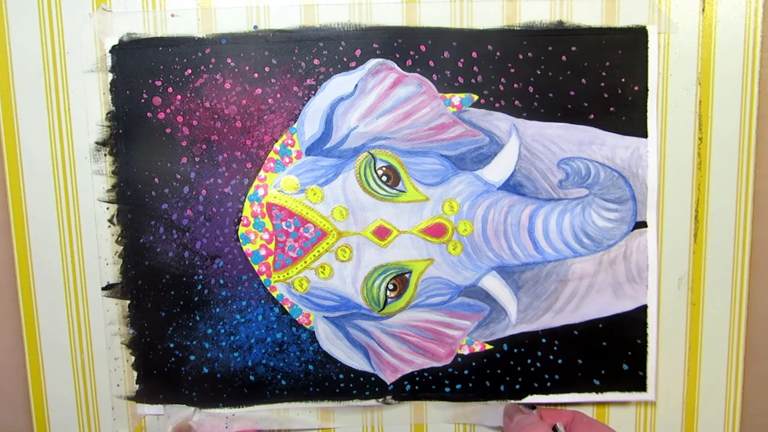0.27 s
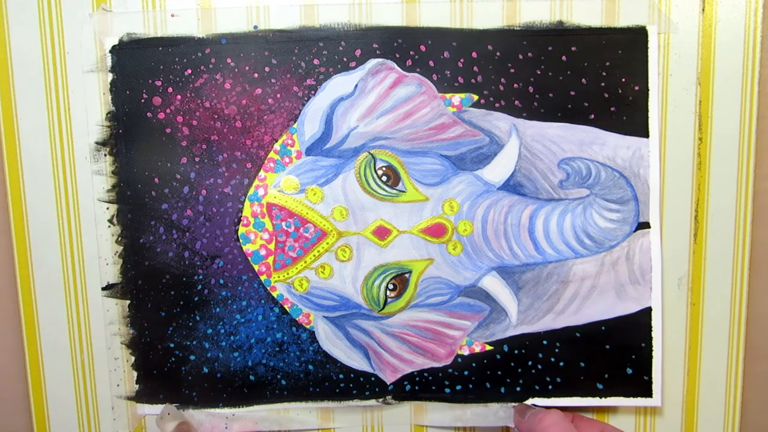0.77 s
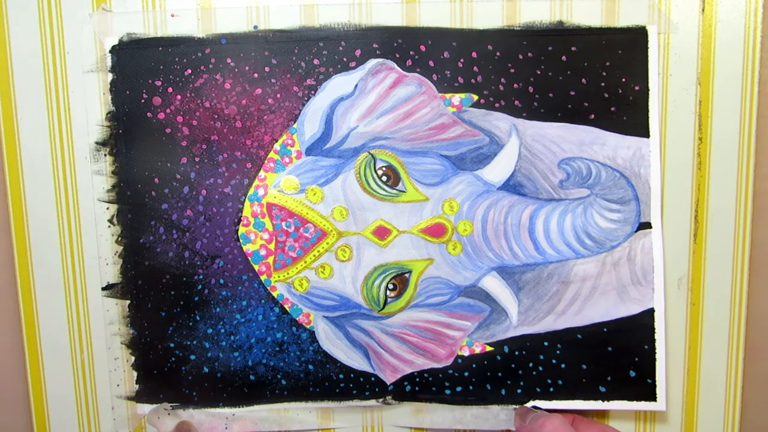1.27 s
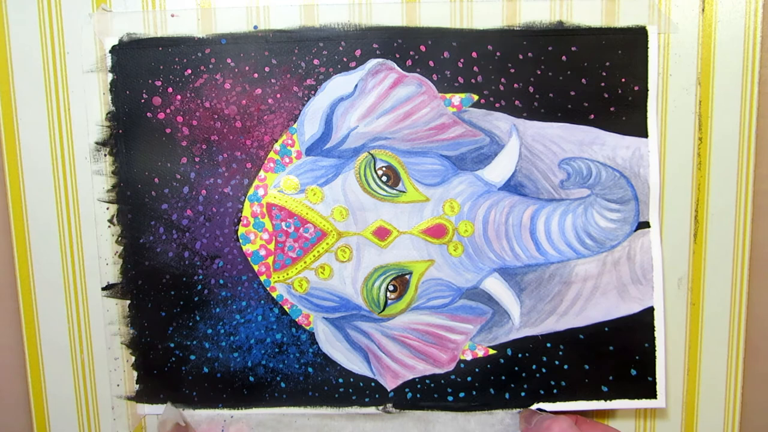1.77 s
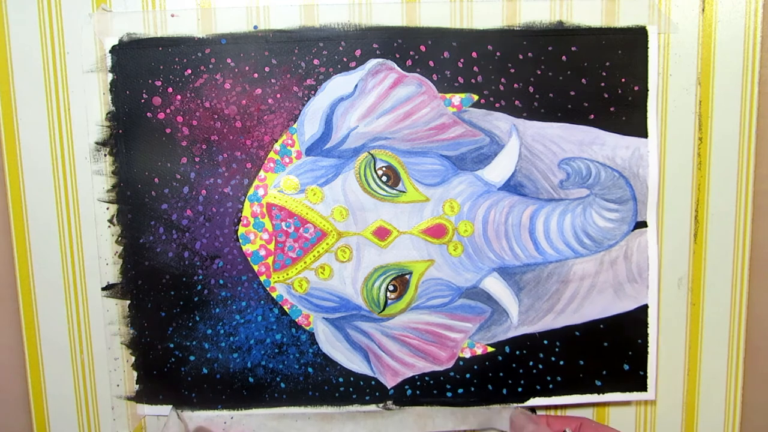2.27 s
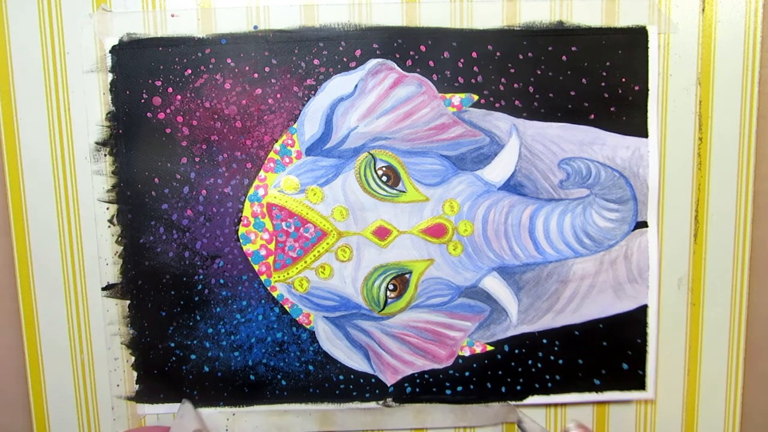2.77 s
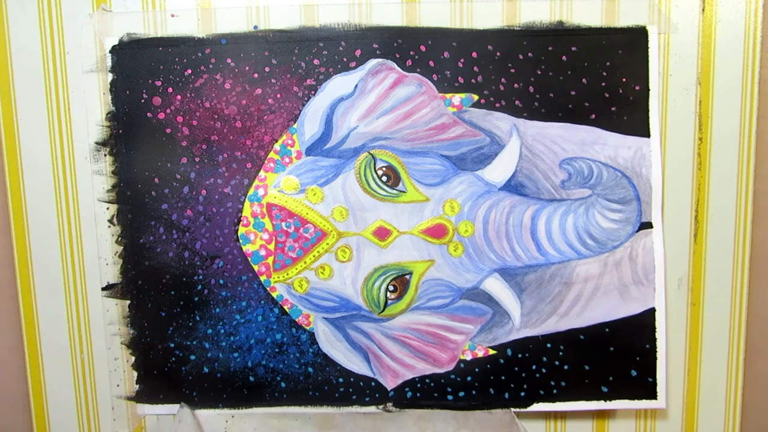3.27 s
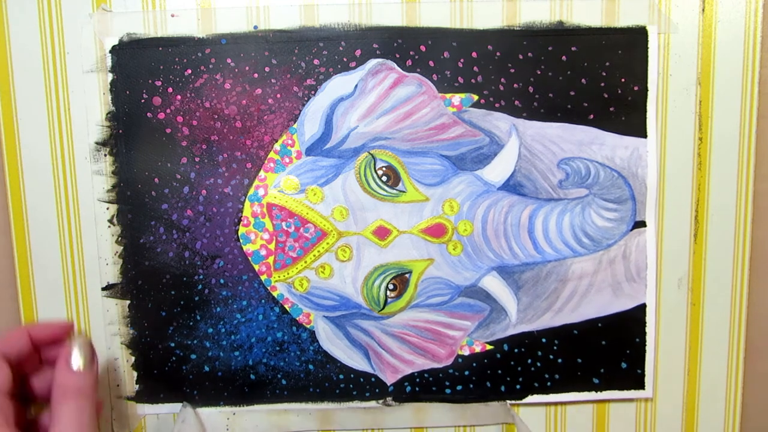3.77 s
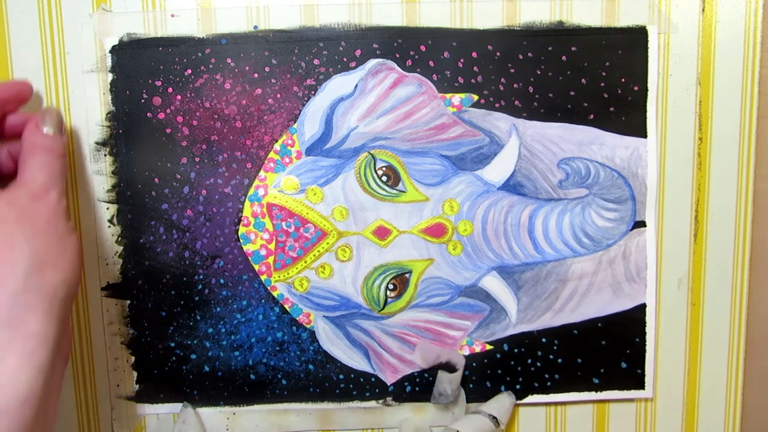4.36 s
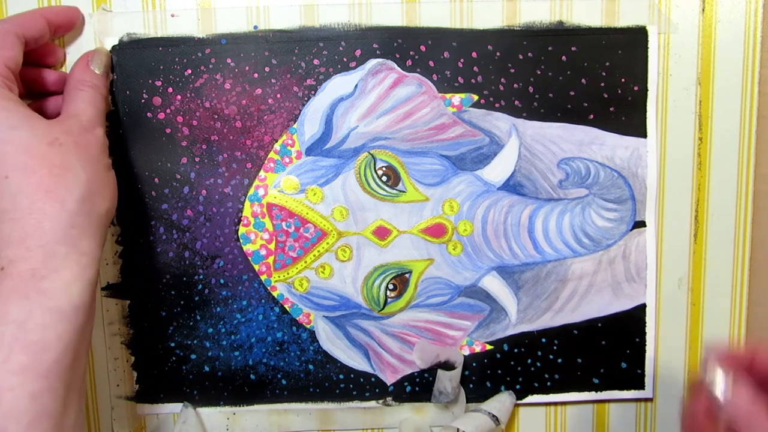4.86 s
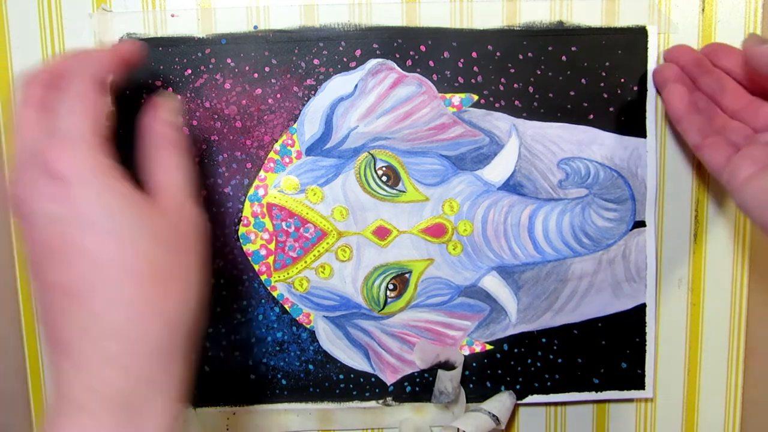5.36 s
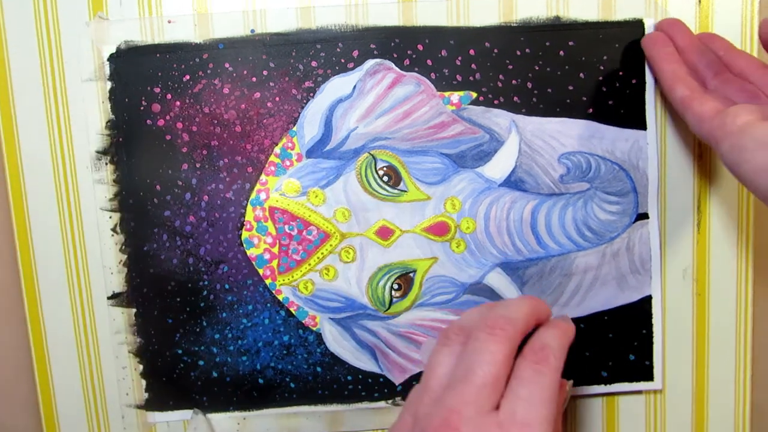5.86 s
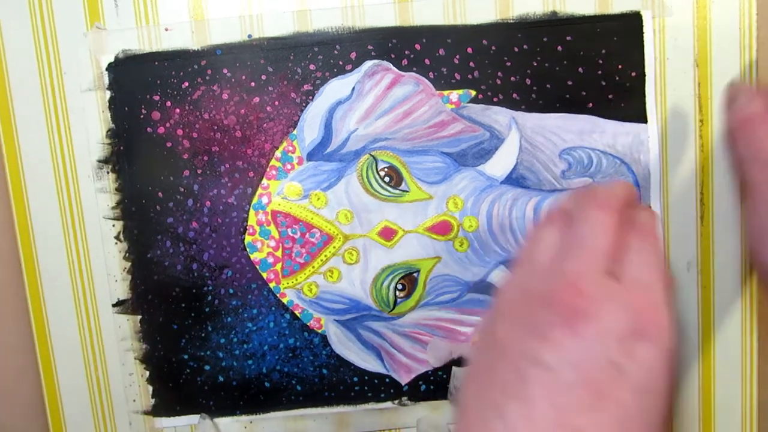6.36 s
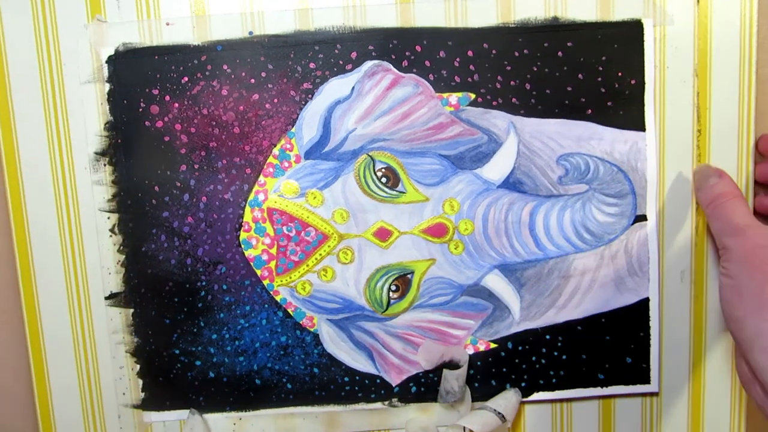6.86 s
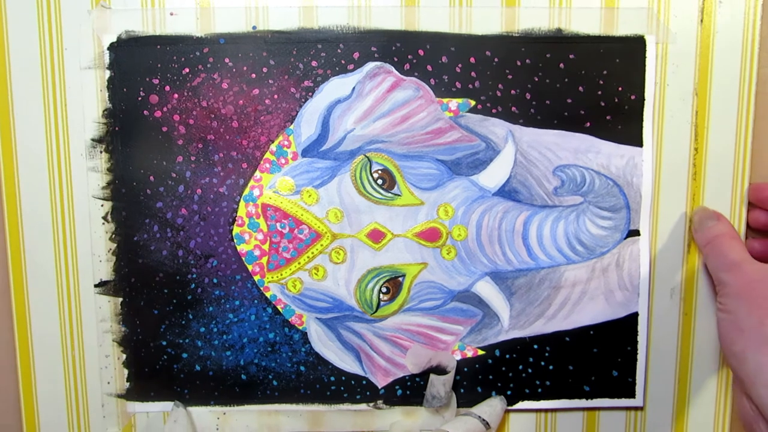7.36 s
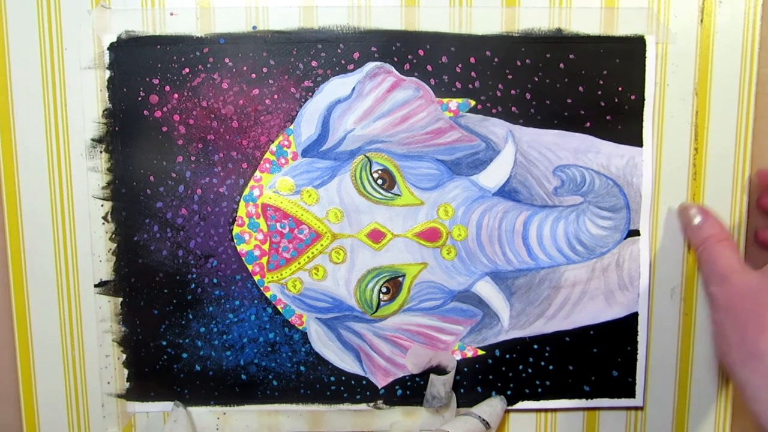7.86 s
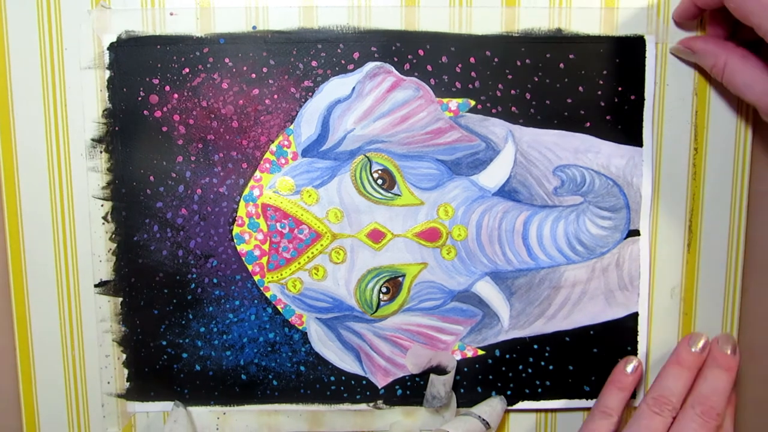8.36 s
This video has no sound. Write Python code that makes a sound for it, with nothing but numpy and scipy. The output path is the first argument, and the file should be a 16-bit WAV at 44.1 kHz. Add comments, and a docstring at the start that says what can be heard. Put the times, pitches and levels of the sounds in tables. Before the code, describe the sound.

A small quiet room, heard close from above in wide stereo: soft airy noise, a faint wavering hum and a very deep drone that swells near 1, 4 and 6 seconds. From the start tape peels off paper in jerks, fine sticky crackle with crisp crinkles, and a strong snap at 0.4. More pops follow at 0.55 and 0.8; from 1.0 to 1.7 rips and snaps crowd together, the loudest, densest stretch. A lull lasts until about 2.2, then lighter crumpling with sharp pops at 2.55 and 2.75, and thin, bright crinkling until about 4.0. At 4.3 a hand swishes over paper; at 4.66 the board slaps the table hard, bouncing quickly with a short woody ring, with small knocks until 5.0. From 5.1 to the end near 8.6, only faint paper rubs, with gaps, and a few tiny finger taps, slightly stronger after 8.3.

```python
"""Masking tape is pulled off a painted sheet in jerks: stick-slip of the glue gives bunches of fine clicks,
single clicks with a brief flutter are the snaps, and dense short runs are the rips. The loose strip is crumpled
from early on. Then hands slide over the paper in swells of clicks, and the board knocks on the table, ringing in
decaying modes; slides and a few faint finger taps end the scene. Throughout, a small quiet room adds coloured
noise, a low wavering hum and a swelling deep drone; all is heard from close above in wide stereo."""
import sys
import numpy as np
from scipy import signal
from scipy.fft import rfft, irfft
from scipy.io import wavfile
from scipy.ndimage import uniform_filter1d

SR = 44100
rng = np.random.default_rng(int(sys.argv[2]) if len(sys.argv) > 2 else 0)


def store_pcm(level_fs):
    """Save levels as 16-bit WAV."""
    pcm = np.round(np.clip(level_fs, -1, 1) * 32767).astype(np.int16)
    wavfile.write(sys.argv[1], SR, np.atleast_2d(pcm).T)


N = 380141
TIME = np.arange(N) / SR
SHOT = TIME[:4096]  # time axis of one short sound, also the length of a filter response

# colour of the tape on the sheet: f/Hz, relative level/dB
TAPE_COLOUR = [(100, -39), (300, -25.5), (600, -18), (1150, -12), (1500, -4.5), (2000, -4), (2700, -3),
               (4200, 1), (6000, -2.5), (8500, -6.5), (11000, -11), (16000, -18.5)]
# resonances of the taped sheet: f/Hz, width/Hz, lift/dB
SHEET_RESONANCES = [(1867, 49, 7.5), (2740, 130, 5), (3680, 97, 3), (4470, 130, -2), (5600, 210, 1.5),
                    (5700, 490, -1)]
# the loose strip is tugged, gathered and crumpled: t/s, length/s, level/dB, treble shelf/dB, ring of the fold f/Hz
CRUMPLE_MOVES = [(0.17, .03, -41.5, 7, 3500), (.21, 0.048, -37.5, 12, 3080), (0.261, 0.079, -51, 2, 6200),
                 (2.175, 0.1, -52.5, 3, 4200), (2.286, .17, -49.5, 8, 5550), (2.461, 0.054, -45, -3, 2480),
                 (2.661, 0.17, -52, -2, 5500), (2.828, .08, -37, 3.5, 4000),
                 (2.902, 0.16, -45.5, 5.5, 6500), (3.028, .27, -54, 2, 6700), (3.403, 0.305, -54, 6, 7020),
                 (3.493, 0.048, -42, 9.5, 7330), (3.658, 0.31, -45.5, 9.5, 7400),
                 (3.821, 0.093, -44.5, -1, 5800), (3.93, .15, -47.5, 10, 6900)]


def undb(db):
    """Amplitude ratio of a level in dB: 20 dB for each factor of ten."""
    return 10 ** (np.asarray(db) / 20)


def unit(x):
    """Normalisation to an rms amplitude of 1."""
    return x / np.sqrt(np.mean(x ** 2))


def fade(t, t60):
    """Exponential decay: the amplitude falls by 60 dB in t60 seconds."""
    return np.exp(-np.log(1000) * t / t60)


def add(out, s, sound):
    """Superposition: mix a sound in at time s, cut off at the end of the scene."""
    i = max(int(s * SR), 0)
    out[i:i + len(sound)] += sound[:max(N - i, 0)]


def through(x, response):
    """Linear filtering: convolve x with an impulse response."""
    return signal.oaconvolve(x, response)[:len(x)]


def body(points, bright_db=0, peaks=()):
    """Minimum-phase response: a causal filter with the given spectrum, treble shelf and resonant peaks."""
    hz = np.maximum(np.fft.rfftfreq(len(SHOT), 1 / SR), 1)
    f, db = np.transpose(points)
    shelf = bright_db / (1 + (4600 / hz) ** 3)
    db = np.interp(np.log(hz), np.log(f), db) + shelf
    for centre, width, lift_db in peaks:
        db = db + lift_db / (1 + (2 * (hz - centre) / width) ** 2)
    # folding the cepstrum onto positive times makes the response causal
    cepstrum = irfft(np.log(undb(db)))
    half = len(SHOT) // 2
    cepstrum[1:half] *= 2
    cepstrum[half + 1:] = 0
    return irfft(np.exp(rfft(cepstrum)))


def walk(rate, count=N):
    """Slow random modulation: a smoothed random staircase with rate steps a second and rms 1."""
    k = int(SR / rate)
    steps = np.repeat(rng.standard_normal(count // k + 1), k)
    return unit(uniform_filter1d(steps, k)[:count])


def clicks(count, rate, spread_db):
    """Random impulses at a mean rate per second: many small, a few large."""
    size = undb(spread_db * np.minimum(rng.exponential(size=count), 4))
    happens = rng.random(count) < rate / SR
    return unit(rng.standard_normal(count) * size * happens + 1e-9)


def stereo(mid, side):
    """Sum-and-difference matrix: left and right from mid and side."""
    return np.array([mid + side, mid - side])


def drone_level():
    """Amplitude envelope: bell-shaped swells over a faint, wandering rest level."""
    # t of the crest/s, half length/s, rms level/dB
    drone_crests = [(1.1, 0.54, -49.5), (4.02, 0.3, -52), (6.11, 0.34, -50), (6.82, 0.073, -56),
                    (8.56, 0.066, -55)]
    rest_db, wander_db = -65.5, 3
    swells = sum(undb(db) * np.exp(-((TIME - s) / half) ** 2) for s, half, db in drone_crests)
    return swells + undb(rest_db + wander_db * walk(7))


def background():
    """Diffuse noise and wavering hum, the noise mostly opposed between the channels, over a modulated drone."""
    # colour of the room air: f/Hz, relative level/dB
    air_colour = [(20, -1), (45, 10.5), (65, 9), (90, 1), (130, 6.5), (200, 3), (380, -1), (600, 0.5),
                  (1200, -1), (1750, 1), (2500, -4), (4000, -5.5), (7000, -8.5), (15000, -15.5)]
    # side of the air against its mid: f/Hz, level/dB
    air_spread = [(50, 8.5), (90, 3), (200, 12), (380, 13.5), (900, 15), (1700, 10.5), (4000, 9), (7000, 5),
                  (15000, 1.5)]
    # wavering hum: mean f/Hz, mean peak level/dB
    hum_tones = [(145.3, -76), (209.9, -70.5), (290.7, -74)]
    air_db, drone_hz = -57.0, 32
    mid, side = (unit(through(rng.standard_normal(N), body(air_colour))) for _ in range(2))
    drift = undb(0.8 * walk(4.7))
    air = undb(air_db) * drift * stereo(mid, through(side, body(air_spread)))

    hum = 0
    for hz, db in hum_tones:
        level = undb(db + 2.8 * walk(12))
        hum = hum + level * np.sin(2 * np.pi * hz * TIME + 1.5 * walk(5))

    cycles = np.cumsum(drone_hz + 0.6 * walk(1.76)) / SR
    drone = np.sqrt(2) * np.sin(2 * np.pi * cycles) * drone_level()
    return air + stereo(hum, 0.62 * hum) + stereo(drone, -.15 * drone)


def facets(depth_db, count=10):
    """Local resonance: each bit of bent tape has chance peaks and dips, as (Hz, width Hz, lift dB)."""
    hz = 1500 * 9 ** rng.random(count)
    return list(zip(hz, 0.13 * hz, depth_db * rng.uniform(-1.14, 1, count)))


def crackle(size, colour, bright_db, peaks, rate, spread_db, jerk_db, facet_db, count=2):
    """Stick-slip: several spots give off fine clicks in uneven bunches, each in its own colour."""
    out = np.zeros(size)
    for _ in range(count):
        jerks = undb(jerk_db * walk(59.96, count=size))
        bunches = clicks(size, rate / count, spread_db) * jerks
        spot = body(colour, bright_db, [*peaks, *facets(facet_db)])
        out += unit(through(bunches, spot))
    return unit(out)


def peeling():
    """Strain-driven stick-slip: glue crackles louder as each pull strains it, and dies as the tape slackens."""
    # the hand pulls on the tape: t/s, length/s, level at the end of the pull, before the trim/dB
    tape_pulls = [(0, 0.054, -42.5), (0.327, 0.064, -38), (0.476, 0.14, -44.5), (0.679, 0.042, -40.5),
                  (0.803, 0.064, -45), (1.037, .17, -36), (1.308, 0.26, -38.5), (1.498, 0.22, -38.5)]
    build_db, release_t60, trim_db = 8, 0.34, -3.0  # growth over a pull, decay in s, overall trim
    strain = 0
    for s, length, db in tape_pulls:
        t = TIME - s
        build = undb(db + build_db * (np.clip(t / length, 0, 1) - 1))
        strain = strain + (t >= 0) * build * fade(np.maximum(t - length, 0), release_t60)
    glue = crackle(2 * SR, TAPE_COLOUR, 0, SHEET_RESONANCES,
                   rate=4000, spread_db=1.5, jerk_db=3.5, facet_db=4.5, count=5)
    out = np.zeros(N)
    add(out, 0, glue)
    return out * strain * undb(trim_db)


def snaps(rows):
    """Sudden release of strain: clicks build up, then one sharp click, and a brief flutter dies away."""
    clean_t60, ragged_t60, flutter_db = 0.018, 0.039, -11  # flutter decay in s at cleanness 1 and 0
    strain_t60, strain_db = 0.0091, -23  # the build-up ahead of the click
    out, head, lead = np.zeros(N), int(.004 * SR), int(.015 * SR)
    t = SHOT - lead / SR
    for s, db, bright_db, clean in rows:
        t60 = ragged_t60 + clean * (clean_t60 - ragged_t60)
        build = undb(strain_db) * fade(abs(t), strain_t60)
        flutter = undb(flutter_db) * fade(abs(t), t60)
        push = np.where(t < 0, build, flutter) * clicks(len(SHOT), 16000, 2.1)
        push[lead] += 1.4 * clean
        snap = through(push, body(TAPE_COLOUR, bright_db, SHEET_RESONANCES + facets(5.5)))
        # the level holds for the first 4 ms from the click on
        add(out, s - lead / SR, snap * undb(db) / np.std(snap[lead:lead + head]))
    return out


def gestures(rows, colour, rate, spread_db, jerk_db, facet_db, lift_db, width_hz):
    """Friction noise: each move swells and fades; its clicks, sparse when gentle, ring the tape or paper."""
    reference_db, doubling_db = -44, 7  # the click rate equals rate at the first, doubles with each of the second
    out, t = np.zeros(N), TIME[:22050]
    for s, length, db, bright_db, hz in rows:
        swell = np.sqrt(np.maximum(np.sin(np.pi * np.minimum(t / length, 1)), 0))
        density = rate * 2 ** ((db - reference_db) / doubling_db)
        ring = [(hz, width_hz, lift_db)]
        move = swell * crackle(len(t), colour, bright_db, ring, density, spread_db, jerk_db, facet_db)
        add(out, s, move / np.std(move[t < length]) * undb(db))
    return out


def buckles(count=6):
    """Buckling instability: creases give way at random moments of each crumple; rows as for the snaps."""
    every_s, louder_db, scatter_db = .07, 5, 2
    brighter_db, clean = 3.5, 0.57  # a little brighter than their crumple
    rows = []
    for s, length, db, bright_db, _ in CRUMPLE_MOVES:
        times = (np.arange(count) + rng.random(count)) * every_s
        levels = db + louder_db + scatter_db * rng.standard_normal(count)
        for t, level in zip(times, levels):
            if t < length:
                rows.append((s + t, level, bright_db + brighter_db, clean))
    return rows


def crumpling():
    """Folding of a thin sheet: resonant bunches of clicks, with sharper buckles among them."""
    # colour of the loose strip: f/Hz, relative level/dB
    strip_colour = [(150, -34), (450, -9.5), (850, -2), (1200, -8.5), (2000, -3.5), (3200, -3.5),
                    (5000, -5.5), (7300, -7), (10000, -14.5), (13000, -29), (16000, -19)]
    folds = gestures(CRUMPLE_MOVES, strip_colour, rate=1500, spread_db=2.5, jerk_db=4.5,
                     facet_db=10.5, lift_db=8.5, width_hz=700)
    return folds + snaps(buckles())


def rips():
    """Chain of fractures: a run of glue threads breaks in quick succession as a stretch of tape tears loose."""
    # t/s, length/s, level before the trim/dB, treble shelf/dB
    tape_tears = [(0.84, .012, -33, 0), (1.049, 0.069, -30, 2), (1.137, 0.036, -28, -3),
                  (1.372, 0.014, -24, -7), (1.469, 0.071, -29.5, 0), (1.569, 0.058, -27.5, 3),
                  (1.662, 0.029, -25, 3), (2.847, 0.026, -27.5, 3), (2.957, 0.02, -29.5, 7),
                  (3.498, 0.016, -31, 19), (3.759, 0.015, -30.5, 15), (3.833, 0.02, -33.5, 32)]
    trim_db, release_t60 = -4.5, 0.012
    out = np.zeros(N)
    for s, length, db, bright_db in tape_tears:
        tear = crackle(len(SHOT), TAPE_COLOUR, bright_db, SHEET_RESONANCES,
                       rate=9000, spread_db=4.0, jerk_db=-0.5, facet_db=8.0)
        release = fade(np.maximum(SHOT - length, 0), release_t60)
        add(out, s, tear * undb(db + trim_db) * release)
    return out


def sliding():
    """Sliding friction: hands and board rub in dense, even clicks that ring the surface."""
    # t/s, length/s, level/dB, treble shelf/dB, ring of the surface f/Hz
    slide_moves = [(4.32, .31, -45.5, -2.5, 9400), (4.58, .36, -52.5, -2.5, 900),
                   (5.13, 0.053, -49, 2, 1800), (5.17, 0.14, -58.5, -3, 5900),
                   (5.53, 0.16, -58.5, -8, 7500), (5.8, 0.19, -55, 5, 2570), (6.04, .09, -49, -3, 7100),
                   (6.13, 0.067, -45, 4, 7540), (6.37, .12, -52.5, 2, 10000), (6.56, 0.18, -58.5, -1, 8630),
                   (6.77, .16, -53.5, 2, 2480), (6.92, 0.24, -55.5, 7, 3250), (7.1, .26, -57.5, -1, 2740),
                   (8.325, 0.062, -47, -10, 6650), (8.42, 0.094, -49, -4.5, 4760),
                   (8.52, .1, -57, -5, 5000)]
    # colour of the rubbing: f/Hz, relative level/dB
    rub_colour = [(150, -14), (450, -6), (1000, -3), (1800, -1.5), (4000, -1), (7000, -1), (9500, -4),
                  (12000, -9.5), (16000, -11.5)]
    return gestures(slide_moves, rub_colour, rate=10000, spread_db=0.4, jerk_db=2.5,
                    facet_db=5.5, lift_db=6.5, width_hz=1900)


def knocks():
    """Impact and modal decay: the board's edge slaps the table and bounces; its modes ring on."""
    # t/s, level/dB
    board_hits = [(4.428, -40.5), (4.6571, -30), (4.6645, -17.5), (4.6852, -21), (4.7071, -26),
                  (4.7302, -34), (4.7657, -37), (4.831, -53), (4.875, -43.5), (4.988, -36)]
    # colour of the slap: f/Hz, relative level/dB
    board_colour = [(80, -28), (190, -17), (270, -22), (450, -10.5), (650, -6), (900, -4.5), (1090, 2),
                    (1370, -12.5), (1800, 3), (2500, -10.5), (3600, -7), (5500, -18), (10000, -21.5),
                    (16000, -39)]
    # modes of the board: f/Hz, relative level/dB, t60/s
    board_ring = [(193, -8.5, 0.47), (686.6, 2.5, 0.29), (1017, 0, .18), (1110, -10, 0.16),
                  (1630, -14, 0.11), (1810, -16, .13), (1950, -11, .14)]
    contact_t60, ring_db = 0.028, -23  # slap decay in s, ring against slap
    t, head = TIME[:SR // 2], int(.006 * SR)
    ring = sum(undb(db) * np.sin(2 * np.pi * hz * t) * fade(t, t60) for hz, db, t60 in board_ring)
    ring = undb(ring_db) * ring / np.std(ring[:head])
    out = np.zeros(N)
    for s, db in board_hits:
        slap = through(clicks(len(t), 16000, 0.64) * fade(t, contact_t60), body(board_colour))
        add(out, s, undb(db) * (slap / np.std(slap[:head]) + ring))
    return out


def room(x, wet_db, near_side_db, pan_db):
    """Reflection: direct sound, scatter from the table and nearby things, then a small room's short tail."""
    # colour of the side reflections: f/Hz, level/dB
    room_spread = [(100, -1), (500, -28), (1200, -27), (2500, -18), (5000, -9.5), (12000, 1)]
    table_db, low_t60, high_t60 = -16, 0.43, 0.22
    t = TIME[:SR // 2]
    split = signal.butter(2, 4500, fs=SR)

    def echoes(start, t60):
        """Diffuse decay of unit energy: random reflections after a first delay."""
        burst = clicks(len(t), 7000, 1.3) * (t > start) * fade(t - start, t60)
        return burst / np.linalg.norm(burst)

    def reflections():
        """Frequency-dependent absorption: below 4500 Hz a longer tail is added to the full-band one."""
        low = signal.lfilter(*split, echoes(.011, low_t60))
        table = undb(table_db) * echoes(.009, 0.02)
        return table + undb(wet_db) * (low + echoes(0.0082, high_t60))

    # the two capsules differ most in the bass and the treble
    near_colour = [(200, -10), (700, -10), (1500, -11.5), (2800, -9.5), (5000, -5.0), (9000, -0.5), (16000, 2)]
    near = through(echoes(0.00071, 0.0081), body(near_colour))
    side = undb(near_side_db) * near + through(reflections(), body(room_spread))
    pan = undb(np.array([[pan_db], [-pan_db]]) / 2)  # positive: louder on the left
    return stereo(x + through(x, reflections()), through(x, side)) * pan


def scene():
    """Superposition of sources: tape, hands and board, each with its own balance in the room."""
    # the tape snaps free, buckles or is tapped: t/s, level/dB, treble shelf/dB,
    # cleanness (1 = one click, 0 = a ragged cluster)
    snap_events = [(0.118, -30, 6, .8), (0.1452, -35, 1, .2), (0.2222, -31, 2, 0.34), (0.3542, -35, 10, .7),
                   (0.4004, -12.5, 1, 0.67), (0.5212, -28.5, -3, .5), (0.542, -27, 3, .5),
                   (0.557, -18, -6, 0.16), (0.7083, -23, -2, 0.49), (0.748, -32.5, 11, 0.17),
                   (0.8114, -26, -10, 0.65), (0.8256, -30, -3, .3), (0.8378, -25, 4, 0.22),
                   (1.0674, -20, -3, 0.32), (1.1039, -27, -12, 0.33), (1.179, -14, -0.5, 1),
                   (1.2045, -21, -4, .5), (1.208, -14, -2.5, 0.34), (1.3807, -27.5, -2, 0.61),
                   (1.4303, -29.5, -10, 0.24), (1.497, -14, 0, 1), (1.5013, -15, -8, 0.58),
                   (1.5501, -19.5, 0, 0.43), (1.5708, -18, -20, 0.55), (1.5815, -16.5, -6.5, .4),
                   (1.6079, -19.5, -8, .75), (1.6667, -17.5, -8, .7), (1.6712, -18.5, 0, 0.55),
                   (1.7107, -15.5, 2, 0.72), (2.2405, -36.5, 5, 0.47), (2.3015, -35.5, 0, 0.26),
                   (2.3242, -32, -11, 0.35), (2.3552, -35.5, 1, .7), (2.4831, -27.5, -9, 0.43),
                   (2.5545, -18.5, -8.5, 1), (2.7603, -21, -2.5, 1), (2.8176, -30.5, 7, .6),
                   (2.8752, -25, 5, .1), (2.9177, -27.5, 12, 0.35), (3.1279, -39.5, 7, .2),
                   (3.5049, -27.5, 22, .4), (3.8, -31.5, 22, 0.18), (3.8383, -26, 7, 0.12),
                   (3.8715, -35, -6, .25), (3.8879, -30, 3, 0.73), (4.05, -36, -1, .4),
                   (5.1345, -39, -6, 0.93), (5.648, -47, 3, .5), (6.005, -40.5, -1, 0.5),
                   (7.7199, -50, -10, .4), (8.2899, -44.5, -9, 1), (8.331, -37, -19, 1),
                   (8.4897, -42, 11, .2)]
    parts = snaps(snap_events), rips() + peeling(), crumpling()
    tape = sum(room(part, wet_db=-14, near_side_db=-5.5, pan_db=-0.8) for part in parts)
    hands = room(sliding(), wet_db=-11, near_side_db=-3.5, pan_db=-0.4)
    board = room(knocks(), wet_db=-13.0, near_side_db=0, pan_db=2.2)
    return tape + hands + board + background()


def record(dry):
    """Band limitation: a steep elliptic low-pass cuts the top above 16 kHz."""
    return signal.sosfilt(signal.ellip(10, .2, 70, 16000, fs=SR, output="sos"), dry)


dry = scene()
out = record(dry)
store_pcm(out)
```